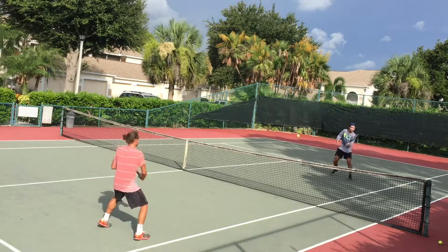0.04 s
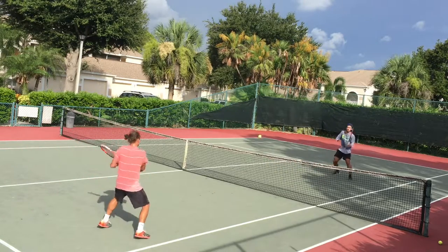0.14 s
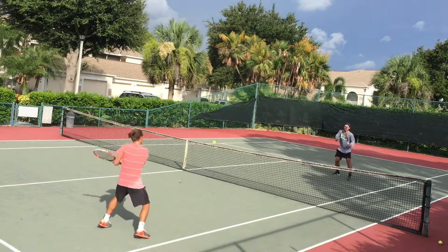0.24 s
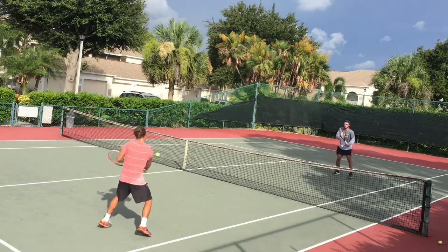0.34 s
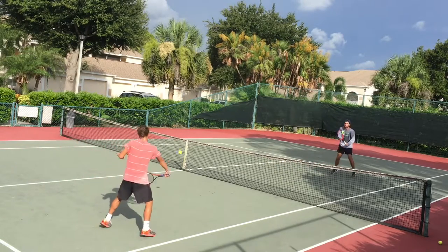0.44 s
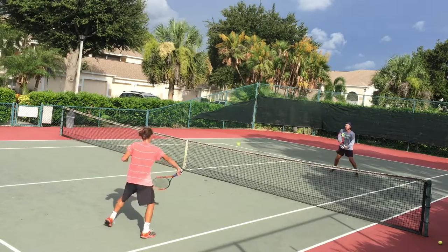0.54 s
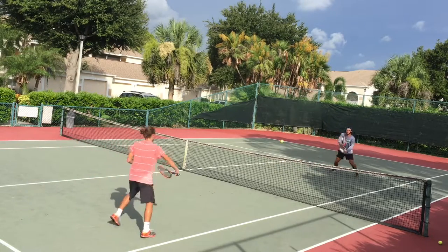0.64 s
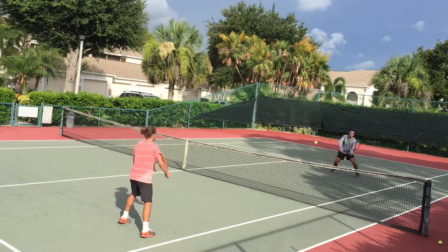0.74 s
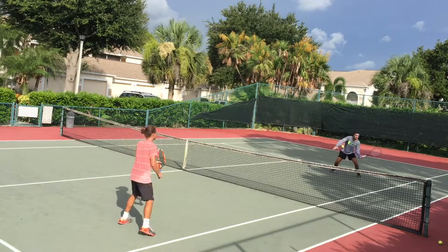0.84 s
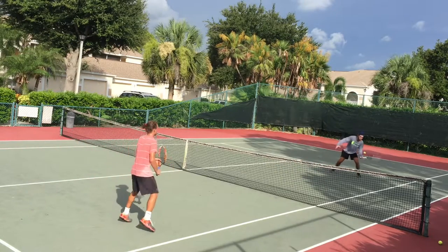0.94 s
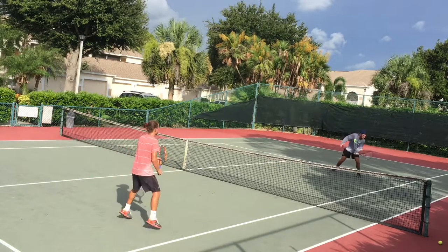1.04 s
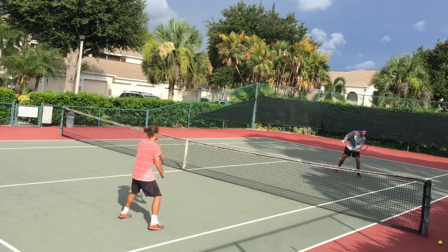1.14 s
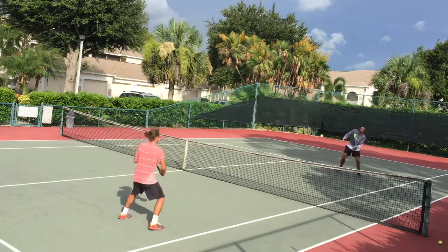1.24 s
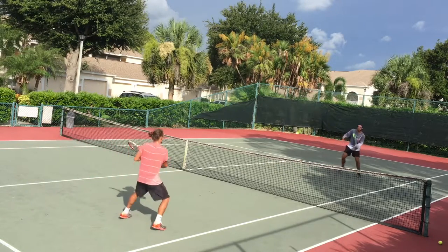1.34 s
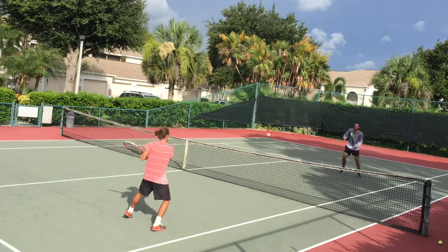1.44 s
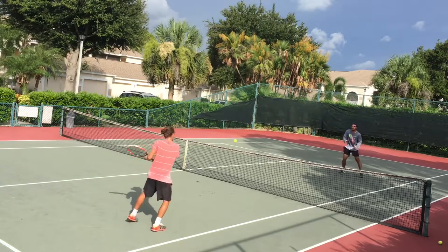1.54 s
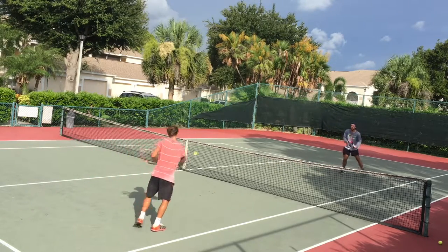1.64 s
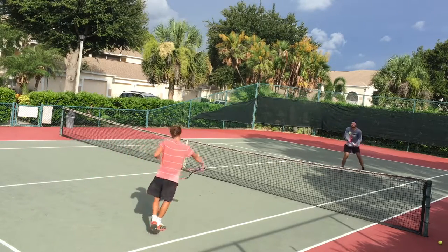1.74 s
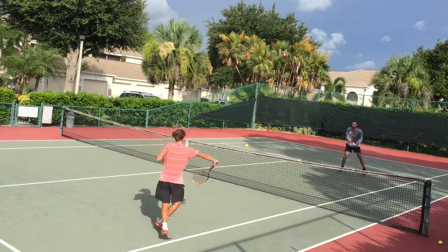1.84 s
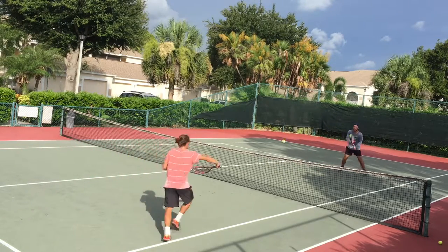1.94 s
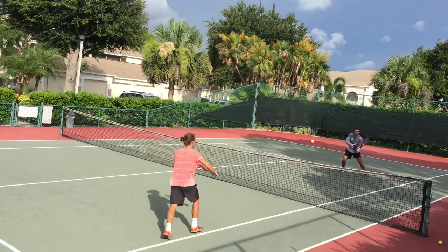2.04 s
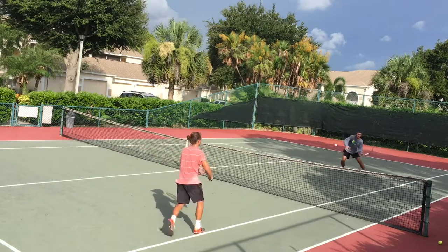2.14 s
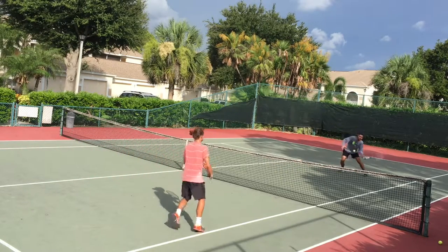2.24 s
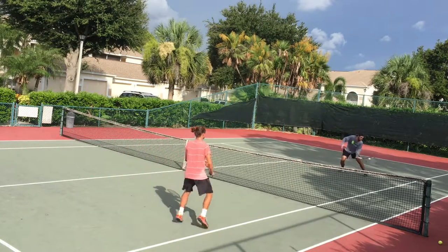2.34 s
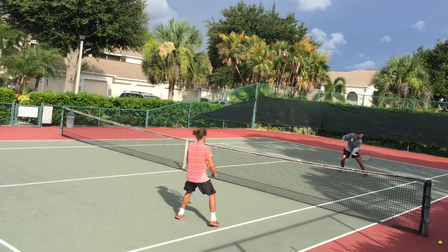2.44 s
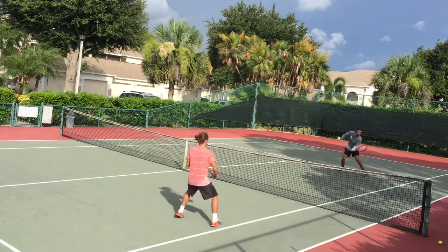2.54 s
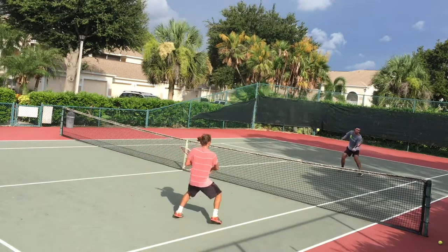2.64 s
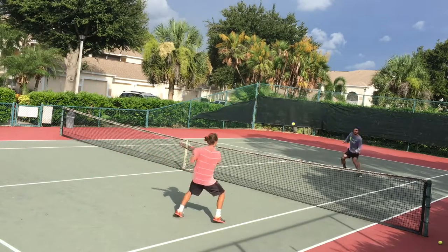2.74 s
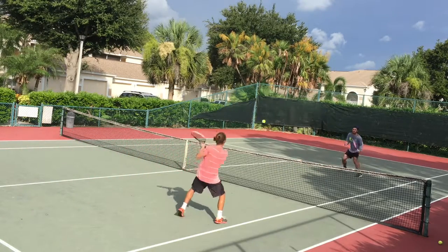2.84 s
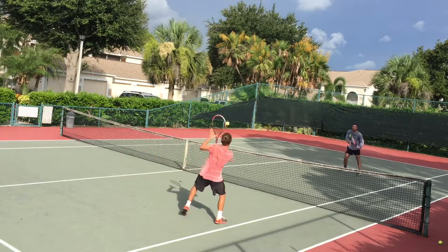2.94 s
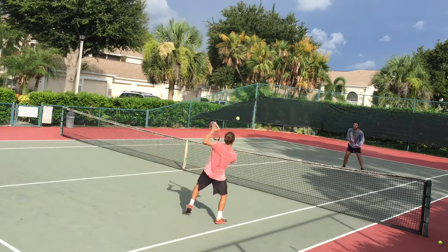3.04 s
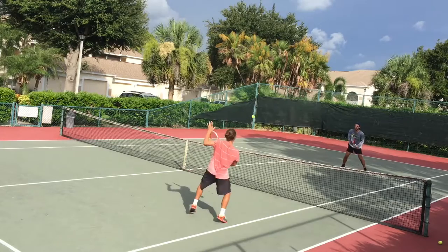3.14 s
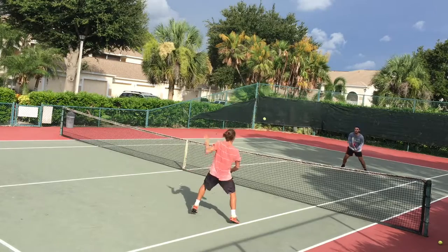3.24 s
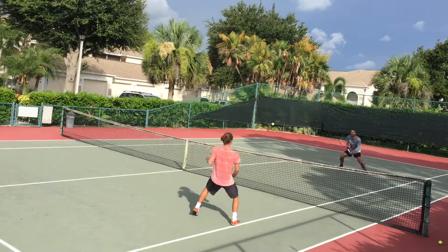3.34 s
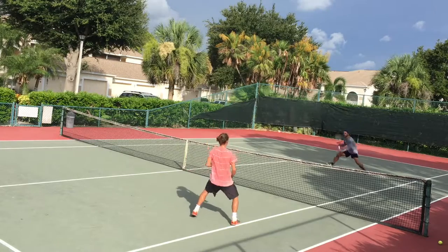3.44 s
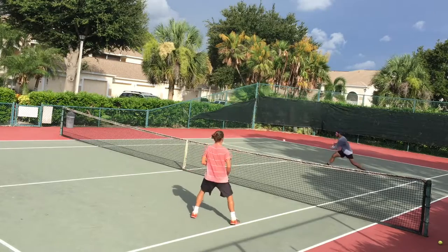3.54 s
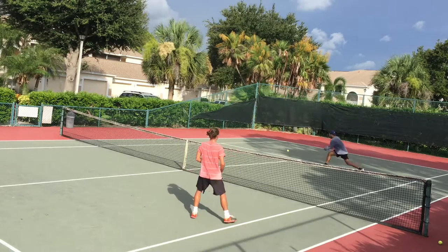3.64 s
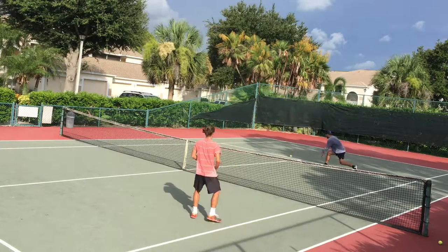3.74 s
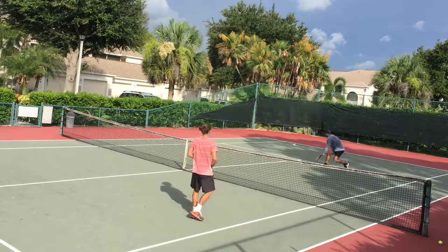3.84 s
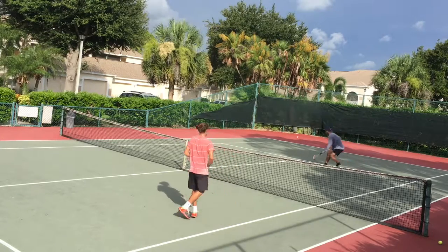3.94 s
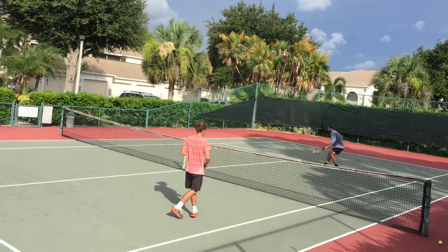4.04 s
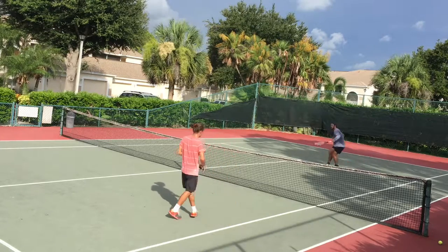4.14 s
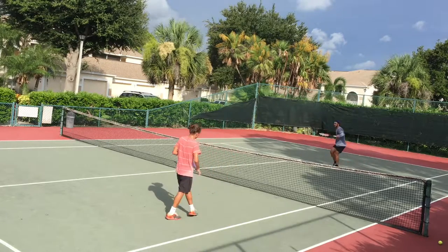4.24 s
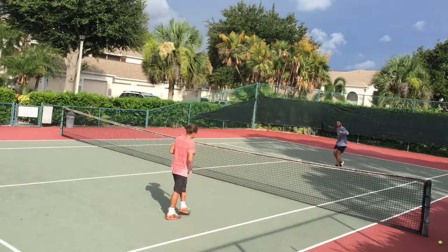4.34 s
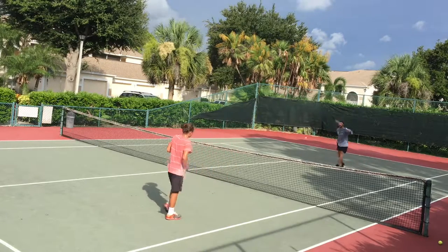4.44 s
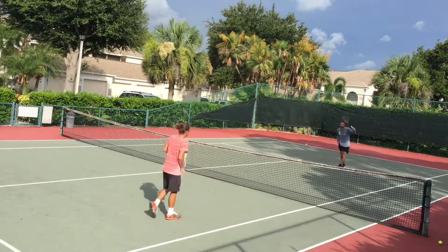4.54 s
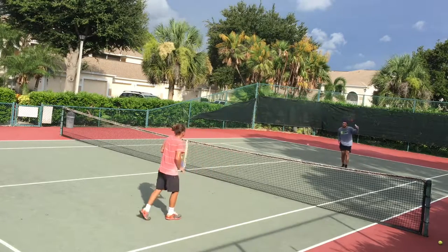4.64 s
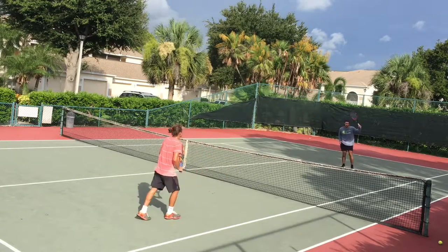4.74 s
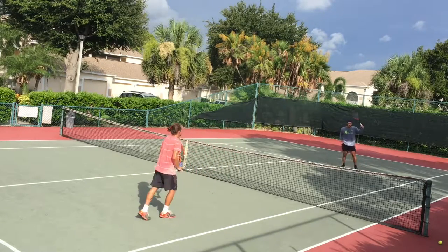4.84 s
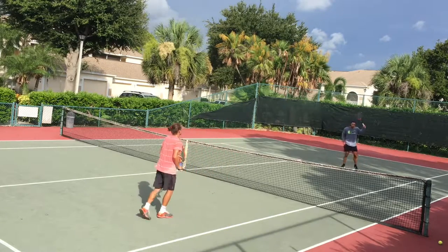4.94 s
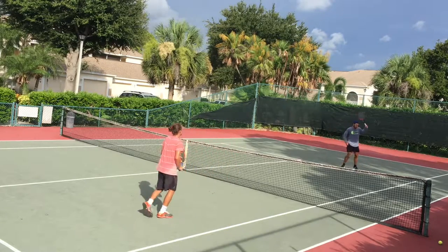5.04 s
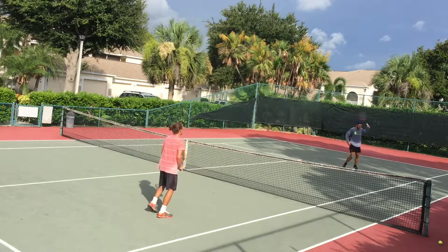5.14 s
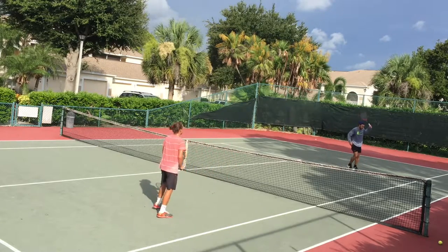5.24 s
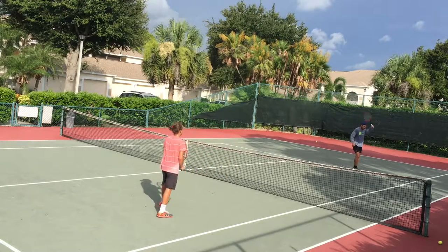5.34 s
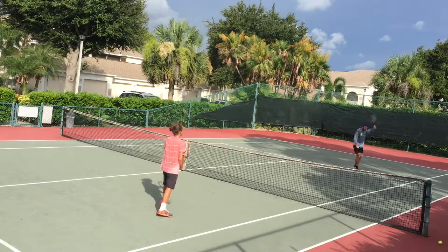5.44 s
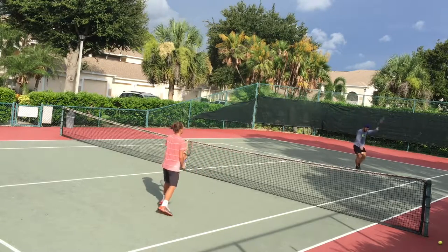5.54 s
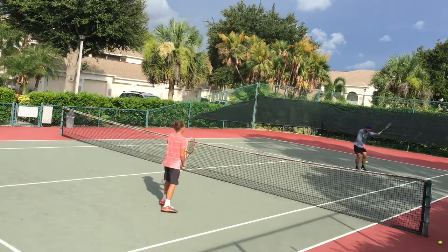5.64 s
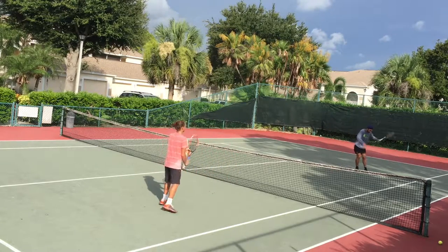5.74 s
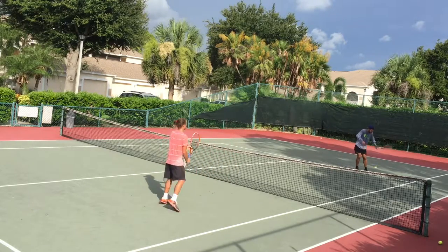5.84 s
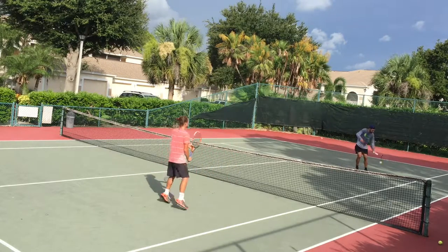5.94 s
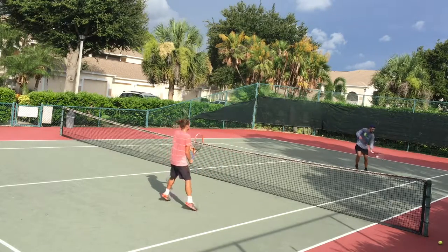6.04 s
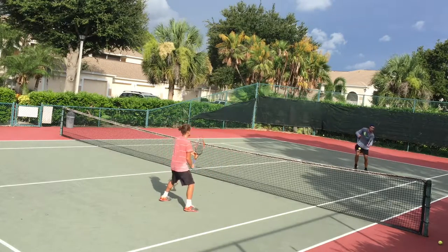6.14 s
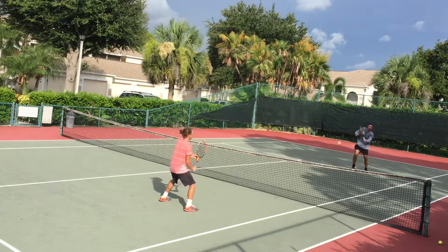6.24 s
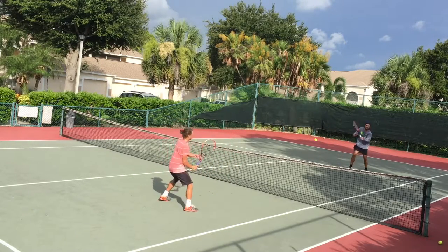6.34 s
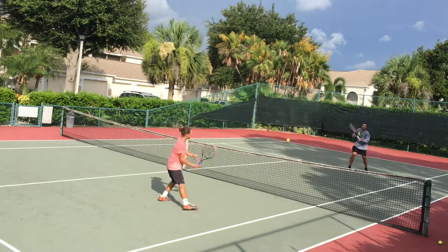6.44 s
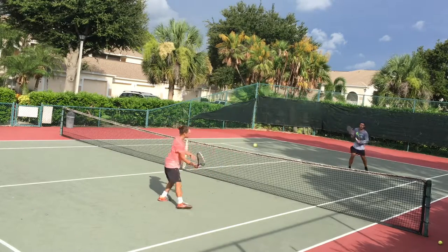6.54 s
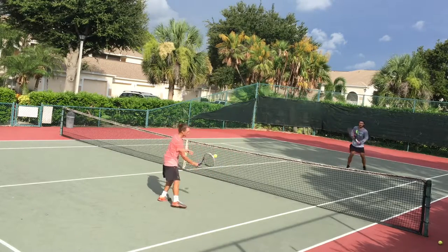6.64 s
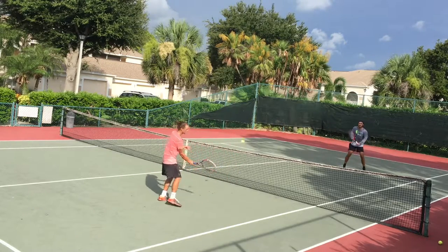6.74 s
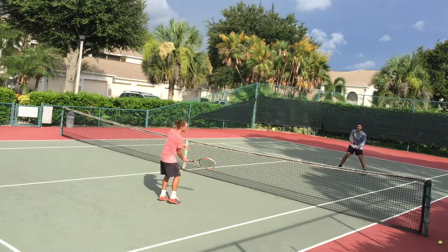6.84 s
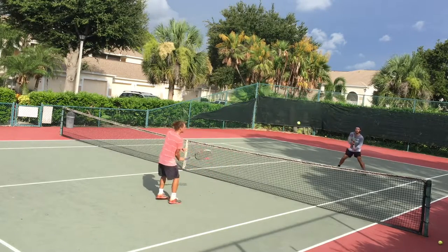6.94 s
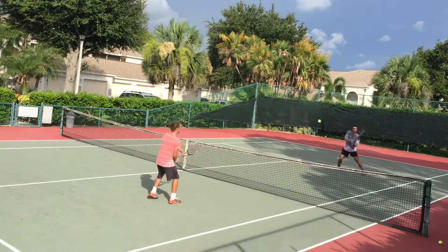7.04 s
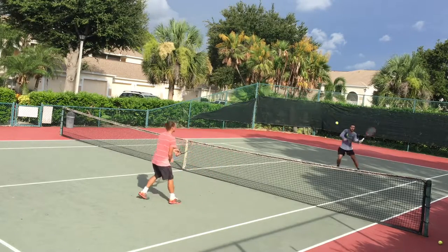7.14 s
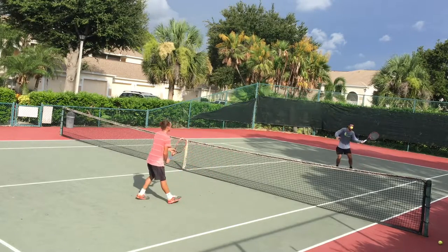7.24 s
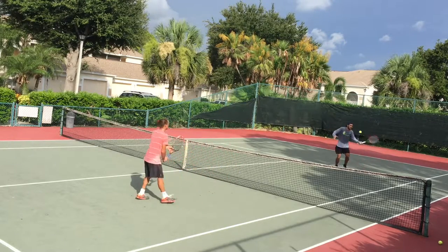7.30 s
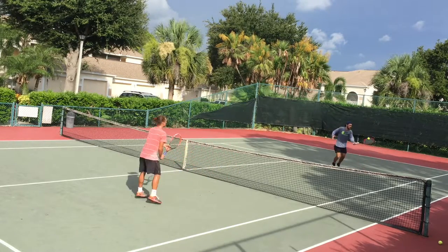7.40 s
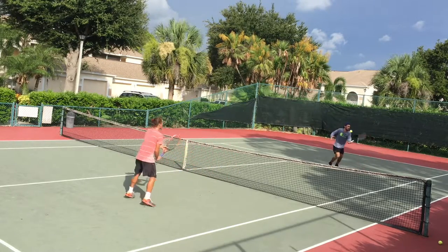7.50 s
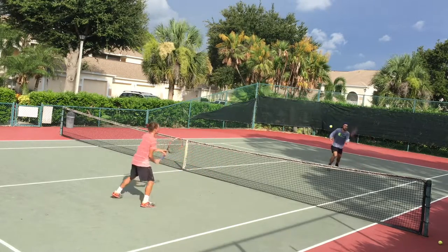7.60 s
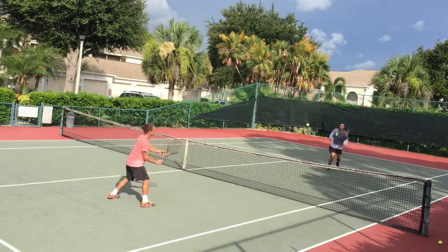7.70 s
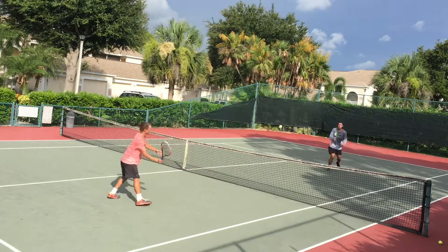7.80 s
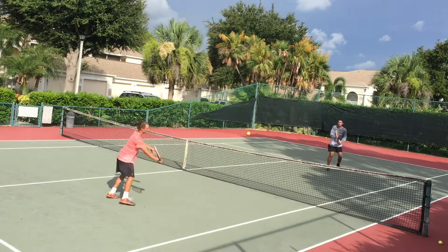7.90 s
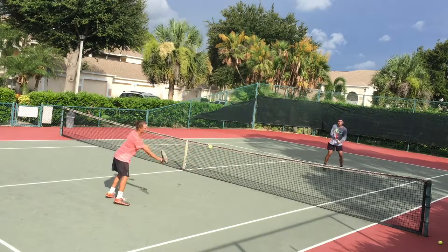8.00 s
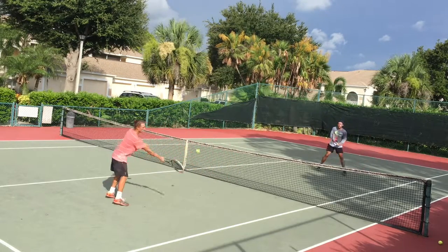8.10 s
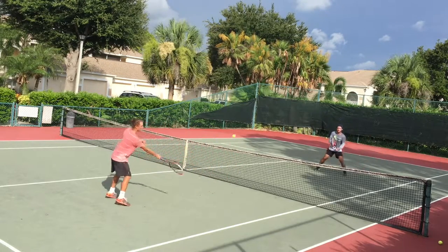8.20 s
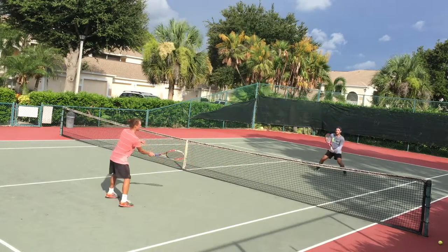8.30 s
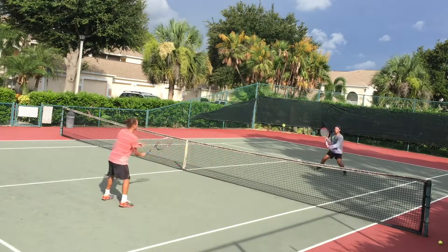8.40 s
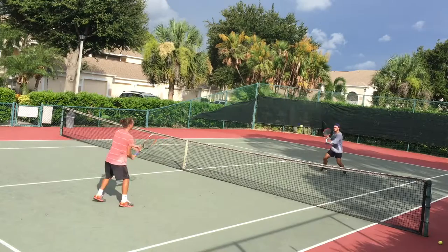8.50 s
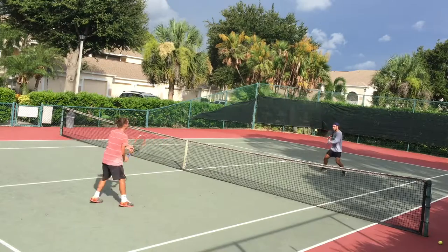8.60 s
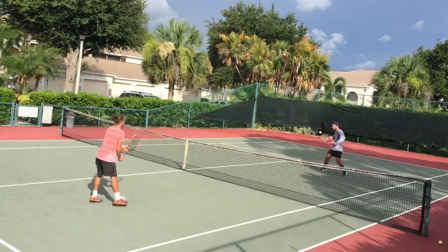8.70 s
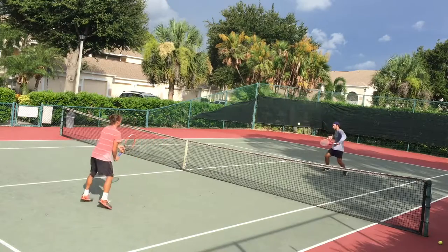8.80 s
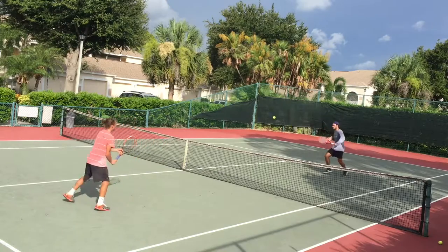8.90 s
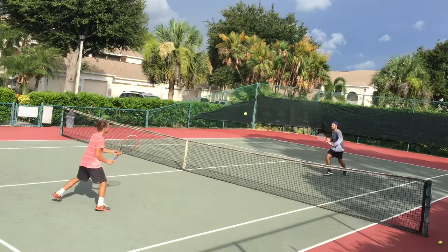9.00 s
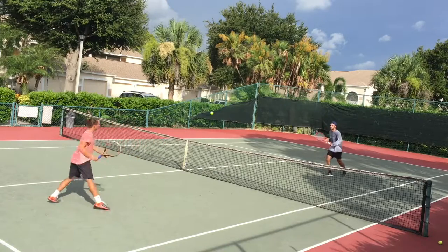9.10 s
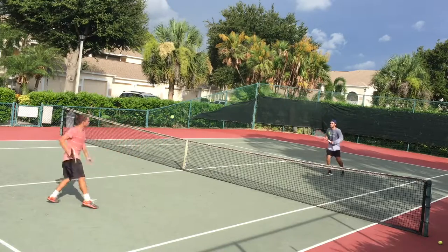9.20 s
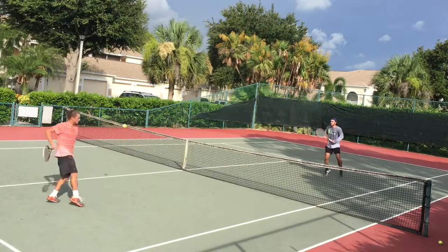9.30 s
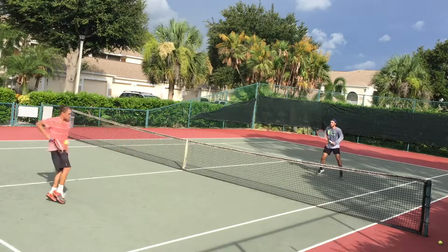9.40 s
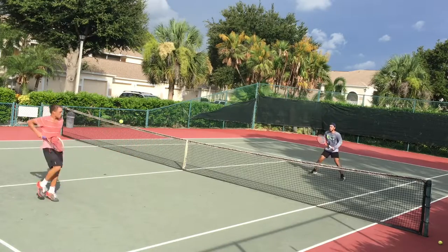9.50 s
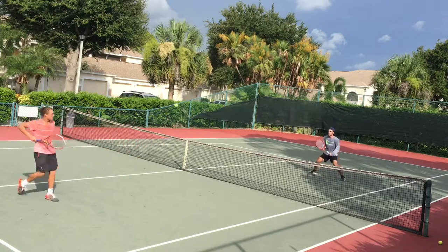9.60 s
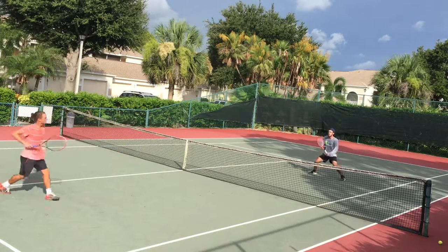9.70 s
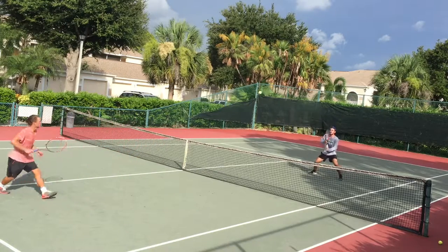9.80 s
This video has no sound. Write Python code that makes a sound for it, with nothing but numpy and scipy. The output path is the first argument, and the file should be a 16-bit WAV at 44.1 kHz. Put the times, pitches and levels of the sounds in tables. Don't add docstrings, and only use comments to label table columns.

```python
import sys
import numpy as np
from scipy import signal
from scipy.fft import rfft, irfft, next_fast_len
from scipy.io import wavfile
from scipy.ndimage import uniform_filter1d

SR = 44100
rng = np.random.default_rng(int(sys.argv[2]) if len(sys.argv) > 2 else 0)


def nominal_scale(level):
    x = np.asarray(level, float) / 20
    return 10 ** x


def put_to_file(sound):
    columns = np.atleast_2d(sound).T
    safe = np.clip(columns, -1, 1)
    whole_steps = np.round(safe * 32767)
    wavfile.write(sys.argv[1], SR, whole_steps.astype(np.int16))


N = 434826
LEAD_S = 0.3

# frequency in Hz, density in dB per Hz.
GRIT_SPECTRUM = [(880, -39), (1500, -8), (1810, -4.5), (4080, -5.5), (6830, -4), (8160, -9.5),
                 (12400, -11.5), (16000, -16)]


def evened(x):
    return x / np.sqrt(np.mean(x ** 2) + 1e-20)


def read(points, hz):
    f, value = np.transpose(points)
    return np.interp(np.log(hz + 1), np.log(f + 1), value)


def add(mix, start_s, sound):
    part = mix[round(start_s * SR):][:len(sound)]
    part += sound[:len(part)]


def coloured(x, points):
    size = next_fast_len(len(x))
    gain = nominal_scale(read(points, np.fft.rfftfreq(size, 1 / SR)))
    return evened(irfft(rfft(x, size) * gain, size)[:len(x)])


def resonate(x, hz, width_hz):
    turn = np.exp(2j * np.pi * np.cumsum(hz * np.ones(len(x))) / SR)
    r = np.exp(-np.pi * width_hz / SR)
    smooth = signal.lfilter([1 - r], [1, -r], x / turn + 1e-18)
    return 2 * (turn * smooth).real


def resonate_twice(x, hz, width_hz):
    return evened(resonate(resonate(x, hz, width_hz), hz, width_hz))


def wobble(count, size):
    return evened(uniform_filter1d(rng.standard_normal(count), size))


def unrolled(rows):
    s, *columns = np.transpose(rows)
    t = np.arange(s[0], s[-1], 1 / SR)
    edge = np.clip(np.minimum((t - s[0]) / 0.0018, (s[-1] - t) / 0.0035), 0, 1)
    return edge, *(np.interp(t, s, c) for c in columns)


def air():
    # frequency in Hz, density in dB per Hz.
    wash_spectrum = [(15, -39.5), (25, -18.5), (55, -2), (206, -13.5), (242, -19), (326, -17), (531, -25.5),
                     (887, -22.5), (1480, -23.5), (1790, -26), (6380, -33), (7710, -35), (16000, -41)]
    # frequency in Hz, width in Hz, level in dB.
    hum_tones = [(57, 14, -68), (240.67, 5.7, -71.5), (543, 5, -93.5), (7900, 300, -88.5)]
    frames, hz = N // 256 + 5, np.fft.rfftfreq(1024, 1 / SR)
    a, b, patches = rng.standard_normal((frames, 513, 3)).T
    patches = evened(uniform_filter1d(uniform_filter1d(patches, 14, 0), 16, 1))
    swell = wobble(frames, size=60)
    gain_db = read(wash_spectrum, hz)[:, None] + 0.58 * patches + 0.72 * swell
    wash = signal.istft((a + 1j * b) * nominal_scale(gain_db), nperseg=1024, noverlap=768)[1][:N]
    out = nominal_scale(-64) * evened(wash)
    for f, width_hz, db in hum_tones:
        out = out + nominal_scale(db) * evened(resonate(rng.standard_normal(N), f, width_hz))
    return out


def blow(db, hz, thump_db, crack_db, contact_ms):
    # frequency in Hz, density in dB per Hz.
    crack_spectrum = [(250, -13), (600, 2.5), (1400, -1), (2300, -11), (3700, -12.5), (6000, -20),
                      (10000, -31.5), (16000, -33)]
    # frequency in Hz, level in dB re crack, t60 in s.
    string_modes = [
        [(650, -4, 0.039), (1375, -7.5, 0.039), (1920, -9, 0.1), (2450, -17, 0.069)],
        [(710, -7, 0.0297), (1770, -6.5, 0.0794), (2086, -12.5, 0.143), (2492, -17, 0.094)],
    ]
    t, contact = np.arange(3500) / SR, contact_ms / 1000

    free_hz, spring_s = 1149.5, 0.005
    free = np.maximum(t - contact, 0)
    swell = np.exp(-(np.minimum(t - contact, 0) / (0.28 * contact)) ** 2)
    fading = 0.85 * np.exp(-(free / 0.003) ** 2) + 0.15 * nominal_scale(-60 * free / 0.05)
    slid = (free_hz - hz) * (free - spring_s * (1 - np.exp(-free / spring_s)))
    shell = swell * fading * np.cos(2 * np.pi * (hz * (t - contact) + slid))

    strings = 0
    for f, mode_db, t60 in string_modes[int(hz > 1000)]:
        strings = strings + nominal_scale(mode_db - 60 * t / t60) * np.sin(2 * np.pi * (f * t + rng.random()))

    racket = contact > 0.0042
    late = t - (contact if racket else 0.005)
    thump_hz = 200 * (0.0066 / contact) ** 1.5 if racket else 190
    thump = np.cos(2 * np.pi * thump_hz * late) * np.exp(-(late * thump_hz / 0.75) ** 2)

    fall = nominal_scale(-60 * np.maximum(t - 0.442 * contact, 0) / 0.036) + 0.24 * nominal_scale(-60 * t / 0.1)
    crack = coloured(rng.standard_normal(len(t)), crack_spectrum) * np.minimum(t / 0.0015, 1) ** 4.8 * fall
    soft = 1 - np.exp(-t / 0.0015)
    return nominal_scale(db) * (shell + soft * nominal_scale(thump_db) * thump + nominal_scale(crack_db - 1.5) * (crack + soft * strings))


def volleys(near):
    # start in s, shell ring in dB, ring in Hz, crack in dB re ring, contact in ms.
    hits = [(-.07, -12.5, 1030, -11.5, 6.2), (0.525, -16, 854, -6.5, 6.3), (1.1472, -15.5, 1120, -12, 4.42),
            (1.8437, -18, 894, -5.5, 6.39), (2.521, -27, 930, 2.5, 5.3), (3.104, -22, 884, -3.5, 5.87),
            (3.732, -39.5, 1498, 3.5, 6), (6.174, -45.5, 1224, 2.5, 5.53), (6.8058, -30, 875, 3, 6.37),
            (7.5682, -17, 1063, -15.5, 5.48), (8.223, -22, 900, -4, 6.64), (8.854, -17, 1074, -15, 5.97),
            (9.5676, -27, 932, 1.5, 6.96)]
    thump_over_crack_db = [2, 9.5]
    for s, db, hz, crack_db, ms in hits:
        thump_db = crack_db + thump_over_crack_db[int(hz > 1000)]
        add(near, LEAD_S + s, blow(db, hz, thump_db, crack_db, ms))


def court(x):
    # frequency in Hz, t60 in s.
    decay = [(150, 0.47), (500, 1), (1000, 0.49), (3000, 0.52), (6000, 0.52), (12000, 0.41)]
    # delay in s, level in dB.
    walls = [(.019, -21.5), (0.173, -39.5)]
    # frequency in Hz, level in dB.
    scatter = [(100, -5.5), (300, -3.5), (700, -6.5), (1150, 3), (1700, -1), (3000, -2.5), (6000, -3.5),
               (16000, -3)]
    t, out = np.arange(SR) / SR, 0
    turn = np.arange(len(x)) / SR * 1.3
    for path in range(3):
        clumps = nominal_scale(3 * wobble(SR, size=700))
        onset = np.clip((t - 0.006) / 0.0092, 0, 1)
        hz, frames, z = signal.stft(clumps * rng.standard_normal(SR) * onset, SR, nperseg=256)
        gain_db = read(scatter, hz)[:, None] - 60 * frames / read(decay, hz)[:, None]
        tail = signal.istft(z * nominal_scale(gain_db), SR, nperseg=256)[1][:SR]
        tail = nominal_scale(-20.5) * tail / np.linalg.norm(tail)
        for s, db in walls:
            slap = rng.standard_normal(200) * np.exp(-np.arange(200) / 40)
            add(tail, s, nominal_scale(db - 13.0) * slap)
        share = np.sqrt(2 / 3) * np.cos(turn + path * np.pi / 3)
        out = out + signal.fftconvolve(share * x, tail)[:len(x)]
    return out


def gravel(count):
    size = nominal_scale(1.5 * rng.exponential(1, count)) * (rng.random(count) < 0.6)
    return size * rng.standard_normal(count)


def squeak(rows):
    edge, db, hz, upper_db, upper_hz, grit_db, rough = unrolled(rows)
    waver = 1 + 0.047 * wobble(len(hz), size=60)
    phase, upper = 2 * np.pi * np.cumsum([hz * waver, upper_hz * waver], axis=1) / SR
    tone = np.cos(phase) + nominal_scale(upper_db) * (np.cos(upper) + 0.26 * np.cos(phase + upper))
    grains, rough = gravel(len(edge)), np.clip(rough, 0, 1)
    chatter = evened(resonate(resonate(grains, 0.92 * hz, 1800.0), 0.94 * hz, 1800.0))
    grip = evened(nominal_scale(3 * np.tanh(wobble(len(hz), size=90))))
    slip = 1.41 * (1 - rough) * grip * tone + rough * chatter
    return edge * nominal_scale(db) * (slip + nominal_scale(grit_db + 6.5) * coloured(grains, GRIT_SPECTRUM))


def squeal(start, length, db, hz, upper_hz, course):
    return [(start + share * length, db + tone, hz, upper, upper_hz, grit, rough)
            for share, tone, upper, grit, rough in course]


def squeaks(near):
    # start in s, length in s, slip tone in dB, slip rate in Hz, upper tone in Hz.
    shrieks = [
        (0.0, .036, -17, 2930, 6030),
        (2.548, 0.041, -11.5, 2995, 5697),
    ]
    peeps = [
        (.047, 0.025, -19, 2680, 5900),
        (8.676, .028, -40, 3100, 6000),
        (0.8864, .034, -22, 3050, 5770),
    ]
    rasps = [
        (.038, 0.033, -29.5, 2900, 6010),
        (1.231, .022, -25, 3300, 6000),
        (2.586, 0.041, -28, 2700, 5250),
        (2.613, .018, -22.5, 2596, 5200),
        (2.8925, .006, -22.5, 2690, 5300),
        (2.892, .04, -27, 2700, 5400),
        (2.904, 0.0091, -21.5, 2600, 5360),
        (6.219, 0.013, -34, 3401, 6300),
    ]
    yelps = [
        (3.374, .014, -37, 3150, 6350),
        (3.389, .01, -19, 3380, 6650),
    ]
    # share of length, tone in dB re peak, upper and grit in dB re tone, chatter 0-1.
    shriek_course = [(0, -11, -17, -26.5, .8), (.24, 0, -13, -29, 0.02), (.8, -12, 0, -26.5, .45),
                     (1, -21.5, -11, -20, .4)]
    peep_course = [(0, -27, -5, -8, .7), (.53, 2, -11.5, -27, 0.32), (1, -19.5, -10, -21.5, 0.29)]
    rasp_course = [(0, -8, -13.5, -20.5, 0.967), (.6, -0.5, -15.5, -29.5, 0.5), (1, -18, -10.5, -27, 0.72)]
    yelp_course = [(0, -12.5, 5, -14, .4), (.55, -1, 4, -27.5, .35), (1, -13, 5, -20, .45)]
    kinds = [(shrieks, shriek_course), (peeps, peep_course), (rasps, rasp_course), (yelps, yelp_course)]
    for events, course in kinds:
        for row in events:
            add(near, LEAD_S + row[0], squeak(squeal(*row, course)))


def drag(rows):
    edge, grit_db, hum_db, hz, low_db = unrolled(rows)
    grains = gravel(len(edge))
    broad = resonate_twice(grains, hz, 2222.0)
    wander_hz = hz * (1 + 0.17 * wobble(len(hz), size=400))
    core = resonate_twice(grains, wander_hz, 600.0)
    low = resonate_twice(grains, 1050, 900.0)
    stutter_db = 1.5 * wobble(len(edge), size=150)
    hum_db = hum_db - 5.0 + 2.2 * wobble(len(edge), size=300)
    hum = nominal_scale(hum_db) * (0.75 * broad + 0.55 * core)
    hiss = coloured(grains, GRIT_SPECTRUM)
    return edge * nominal_scale(grit_db + stutter_db) * (hiss + hum + nominal_scale(low_db - 6.0) * low)


def brush(start, rise, fall, db, hz, course):
    times = start + np.array([0, rise, rise + fall / 2, rise + fall])
    hum_hz = hz * (1 - 0.12 * np.array([0.0095, 0.051, 0.5, 0.993]))
    return [(s, db + grit, hum, f, low) for s, f, (grit, hum, low) in zip(times, hum_hz, course)]


def brushes(near):
    # start in s, rise in s, fall in s,
    # grit in dB, sole hum in Hz.
    hisses = [(.465, 0.014, .013, -60, 1920), (.66, 0.026, 0.0522, -51, 3900),
              (1.59, 0.025, 0.054, -52, 1920), (2.196, 0.0098, 0.017, -39.5, 2660),
              (6.188, 0.0086, 0.037, -38.5, 3267), (6.82, .005, 0.086, -49.5, 2555),
              (7.39, 0.0111, 0.026, -49, 3570), (7.43, 0.039, 0.0055, -60, 4250),
              (7.585, 0.0533, 0.011, -46.5, 1874), (8.72, 0.048, .013, -57, 2930),
              (9.53, .036, .004, -54.5, 1846), (9.845, 0.018, 0.0092, -42.5, 3440)]
    scuffs = [(.365, .004, .01, -71, 2980), (.54, 0.0139, 0.043, -41, 2470),
              (.975, 0.012, 0.031, -53, 2910), (3.275, 0.055, 0.0249, -47, 3630),
              (3.357, .036, .014, -31, 3440), (4.14, .014, 0.012, -61.5, 3810),
              (4.868, .012, .06, -61, 4400), (5.972, .003, 0.0074, -62, 2800),
              (7.0, 0.032, 0.014, -46, 2450), (7.255, 0.0337, 0.042, -49.5, 3210),
              (8.938, .047, 0.083, -40.5, 2930), (9.17, .004, .01, -66.5, 3300),
              (9.25, 0.0153, .03, -55, 3000), (9.274, 0.021, 0.16, -40, 3800)]
    chirps = [
        (1.474, 0.01, 0.015, -56.5, 2120),
        (2.833, .004, 0.024, -61.5, 2900),
        (3.705, .008, 0.024, -63.5, 2940),
        (4.355, 0.023, 0.034, -62.5, 2870),
        (4.992, .04, 0.023, -58.5, 1750),
        (6.44, 0.041, 0.095, -72.5, 2200),
        (8.365, 0.038, 0.018, -48, 3217),
    ]
    scrapes = [
        (5.448, 0.0065, 0.11, -46, 1897),
        (6.575, .05, .21, -42, 3600),
        (7.86, 0.074, 0.02, -50, 3300),
    ]
    # grit in dB re peak, hum and low scrape in dB re grit.
    hiss_course = [(-15, -7, -2), (0, -8, -7.5), (-7, -5, -5.5), (-22, 7, 5)]
    scuff_course = [(-15, -9, -5), (0.5, 3.5, -19.5), (-7, 2, -23), (-23.5, 6.5, -2.5)]
    chirp_course = [(-14.5, 7.2, -3.5), (0.5, 11.7, -7), (-3.5, 9.7, -4), (-19, 12, 5.5)]
    scrape_course = [(-15, -1, 6), (-0.5, -7, 1.3), (-6.5, 1.5, 2.6), (-20, 5, 7.6)]
    kinds = [(hisses, hiss_course), (scuffs, scuff_course), (chirps, chirp_course), (scrapes, scrape_course)]
    for events, course in kinds:
        for row in events:
            add(near, LEAD_S + row[0], drag(brush(*row, course)))


def taps(near):
    # start in s, ring in dB, ring in Hz, thump in dB re ring, crack in dB re ring.
    knocks = [(0.72, -45.5, 870, 4, -10.5), (1.322, -42.5, 920, 2.5, -7), (1.94, -43.5, 1050, 5.5, -3.5),
              (2.204, -38.5, 885, 2, 1.5), (2.625, -31.5, 900, -15, -9), (2.693, -43.5, 950, -4.5, -6.5),
              (3.436, -52, 1330, -1.5, -2.5), (3.45, -49.5, 1016, -2.5, 0), (3.892, -35, 1020, -4.5, -8.5),
              (4.721, -53.5, 660, 6, -2.5), (4.778, -44.5, 1075, 2, -16), (5.9217, -39.5, 1197, -3.5, -16),
              (6.282, -61.5, 650, 11.5, 1.5), (8.94, -44, 910, 3, -18), (9.2, -55, 1005, 5.5, -5.5),
              (9.8205, -44, 1500, -6.5, 1.5)]
    for s, db, hz, thump_db, crack_db in knocks:
        contact_ms = min(1000 * 2.4 / hz, 4)
        add(near, LEAD_S + s, blow(db, hz, thump_db, crack_db, contact_ms))


def slide(start, length, first_db, last_db, hz, course):
    grab_s, lift_s, sag, rise_per_db = 0.0093, 0.036, 0.12, 0.0462
    times = start + np.array([0, grab_s, length - lift_s, length])
    weight_db = np.array([first_db, first_db, last_db, last_db])
    hum_hz = hz * (1 - sag * (times - start) / length + rise_per_db * (weight_db - first_db))
    return [(s, db + grit, hum, f, low)
            for s, db, f, (grit, hum, low) in zip(times, weight_db, hum_hz, course)]


def slides(near):
    # start in s, length in s, first grit in dB, last grit in dB, sole hum in Hz.
    hum_slides = [
        (2.01, 0.082, -55.5, -58.5, 3100),
        (3.82, .16, -69, -68, 6160),
        (5.055, 0.059, -69.5, -69, 2940),
        (5.55, 0.1, -67, -62.5, 3870),
        (7.654, 0.17, -47.5, -48, 3720),
        (7.81, .11, -64, -65.5, 3700),
        (8.605, .105, -51.5, -44, 2470),
    ]
    skids = [
        (5.718, 0.096, -48, -44.5, 2970),
        (7.996, 0.1905, -42.5, -50, 4500),
    ]
    # grit in dB re weight, hum and low scrape in dB re grit.
    slide_course = [(-4, 5.7, 12), (-1, 3, -12), (0, 8.4, -6), (-15, 7, -5)]
    skid_course = [(-9, -4, 7), (1, -28, 0.5), (0.5, -9, -6.5), (-20, -3, -2)]
    for events, course in [(hum_slides, slide_course), (skids, skid_course)]:
        for row in events:
            add(near, LEAD_S + row[0], drag(slide(*row, course)))


def scene():
    near = np.zeros(N + round(LEAD_S * SR))
    volleys(near)
    squeaks(near)
    brushes(near)
    taps(near)
    slides(near)
    return ((near + court(near))[-N:] + air())[None]


def band_limit(x):
    return signal.sosfilt(signal.butter(12, 16990, fs=SR, output="sos"), x)


def record(dry):
    thin = signal.sosfilt(signal.butter(4, 38, "high", fs=SR, output="sos"), dry)
    band = signal.firwin(255, 15900, fs=SR, window=("kaiser", 9))
    return band_limit(signal.oaconvolve(thin, band[None], "same"))


dry = scene()
out = record(dry)
put_to_file(out)
```